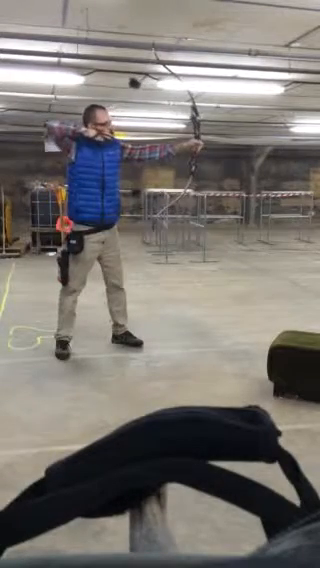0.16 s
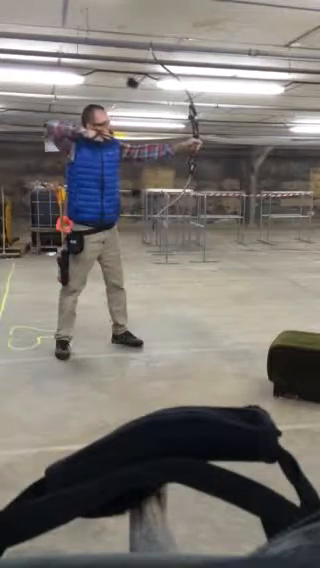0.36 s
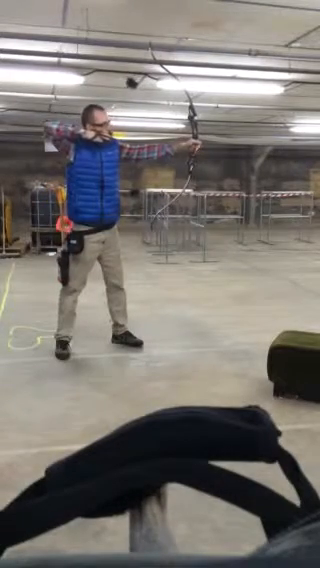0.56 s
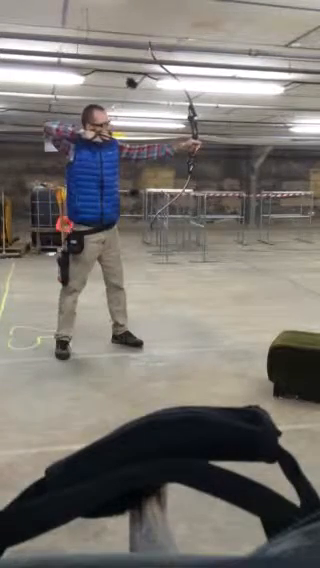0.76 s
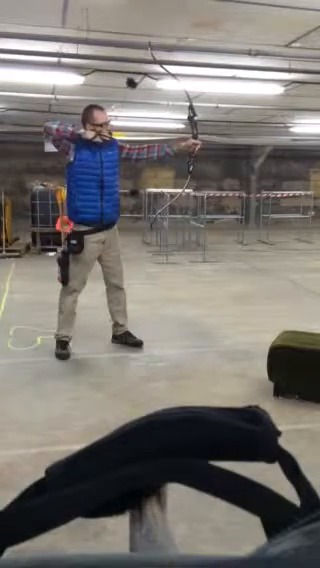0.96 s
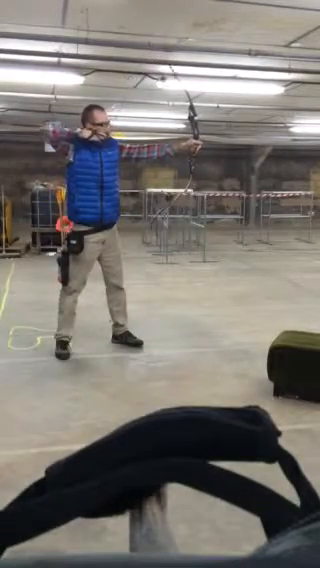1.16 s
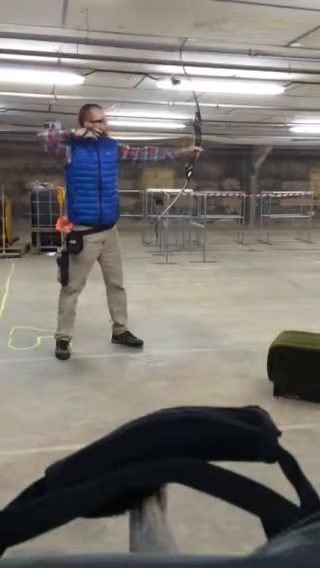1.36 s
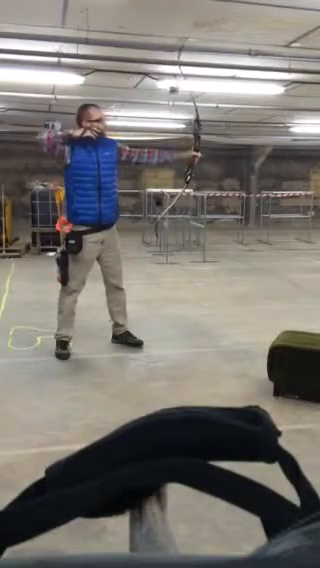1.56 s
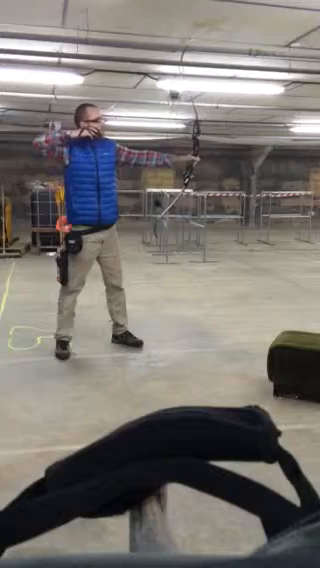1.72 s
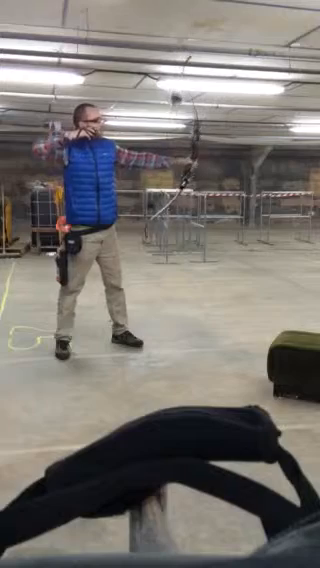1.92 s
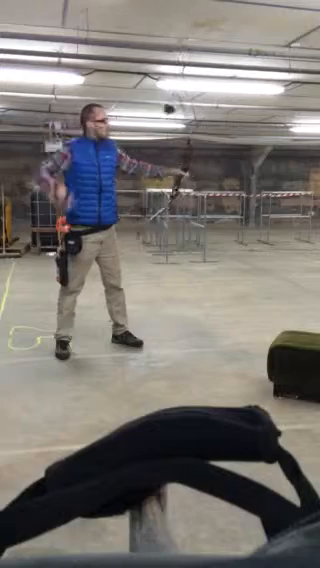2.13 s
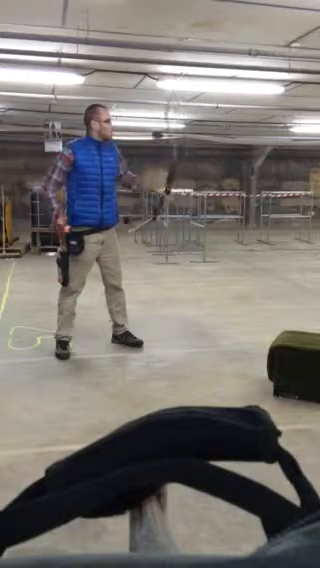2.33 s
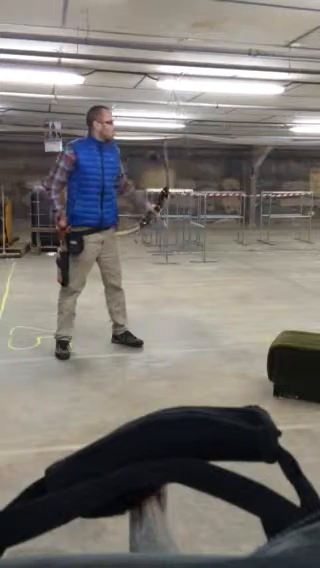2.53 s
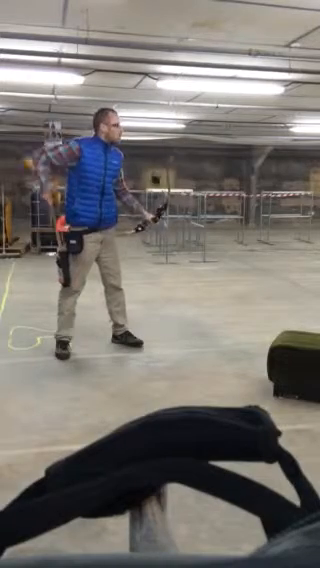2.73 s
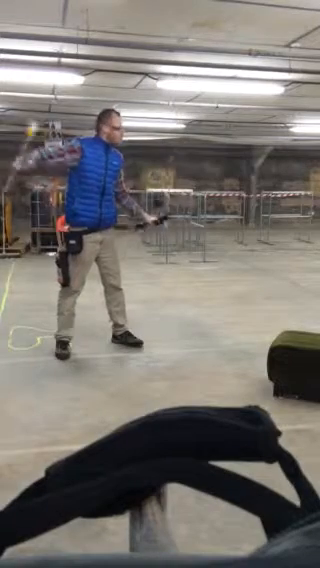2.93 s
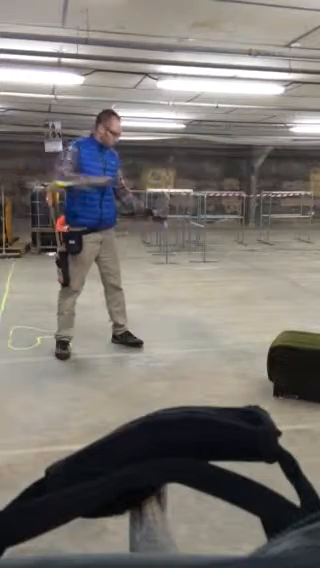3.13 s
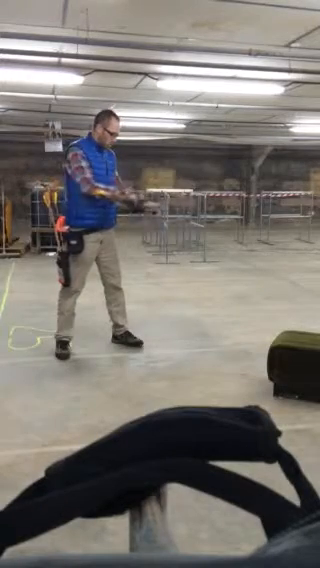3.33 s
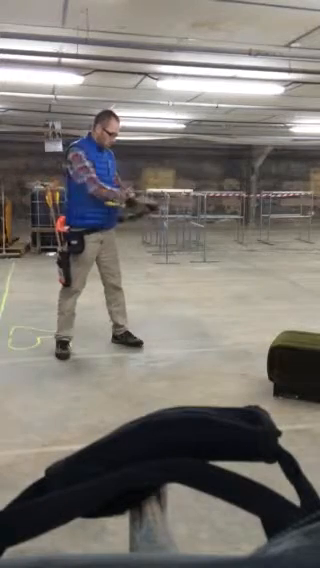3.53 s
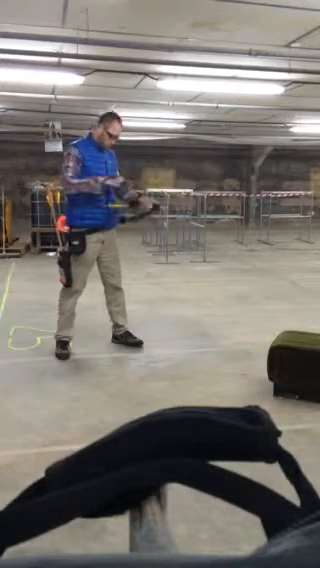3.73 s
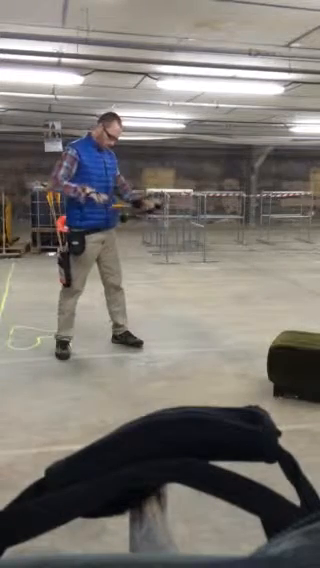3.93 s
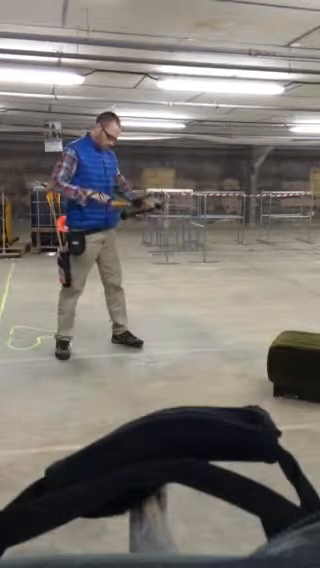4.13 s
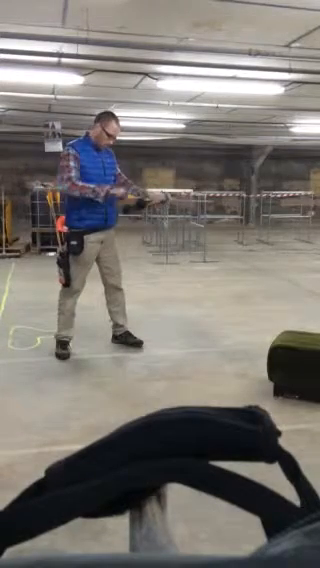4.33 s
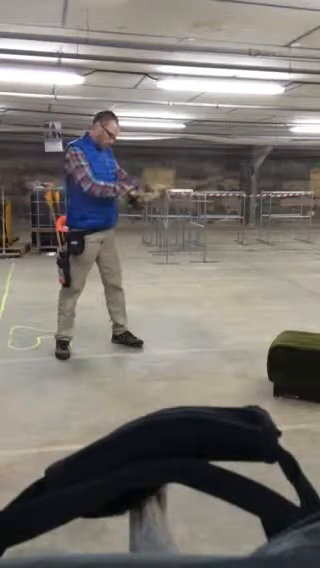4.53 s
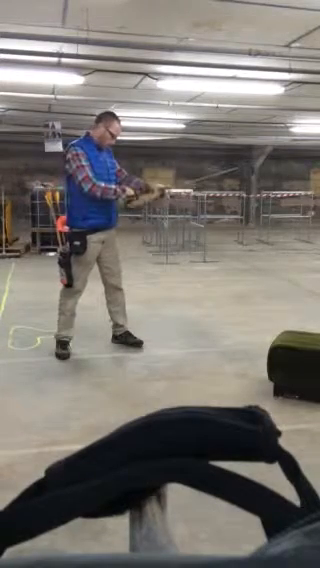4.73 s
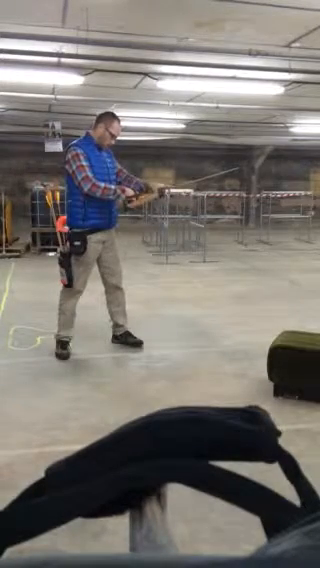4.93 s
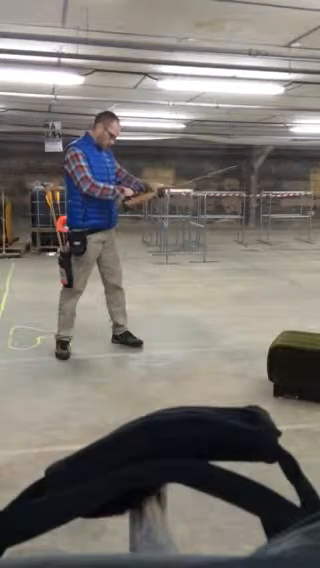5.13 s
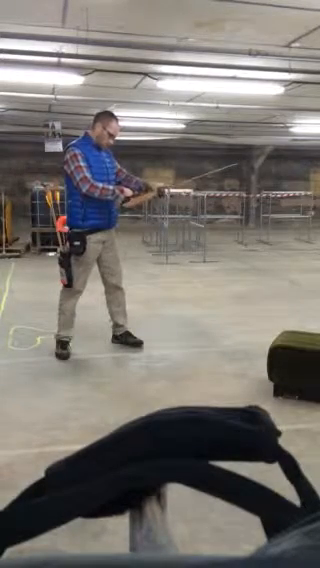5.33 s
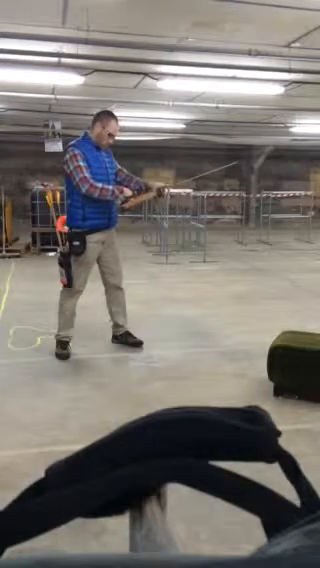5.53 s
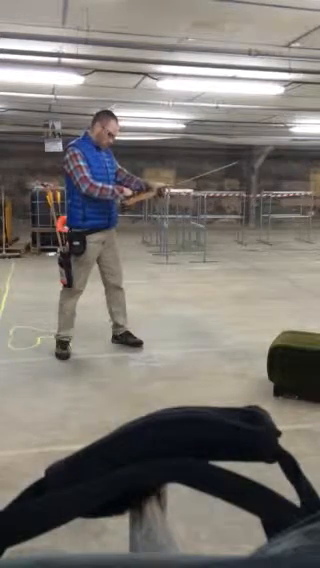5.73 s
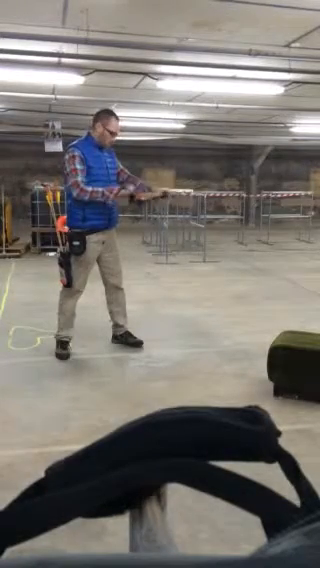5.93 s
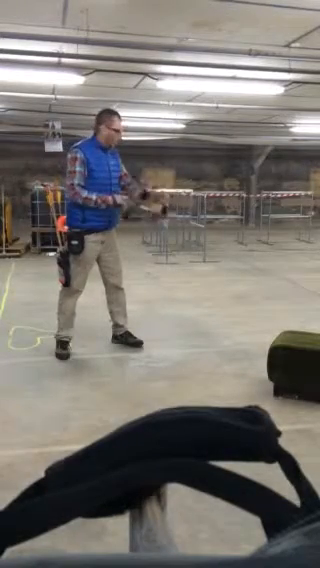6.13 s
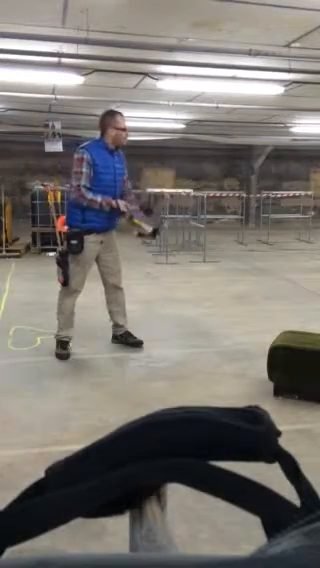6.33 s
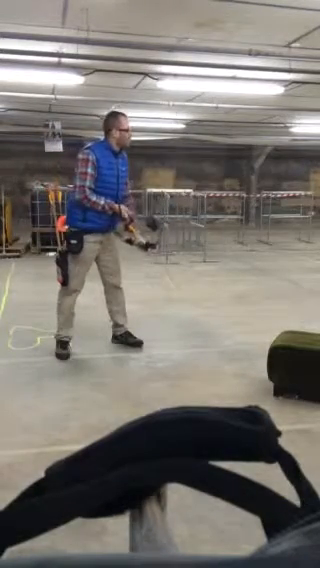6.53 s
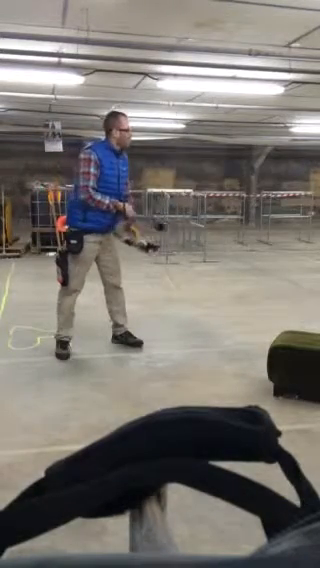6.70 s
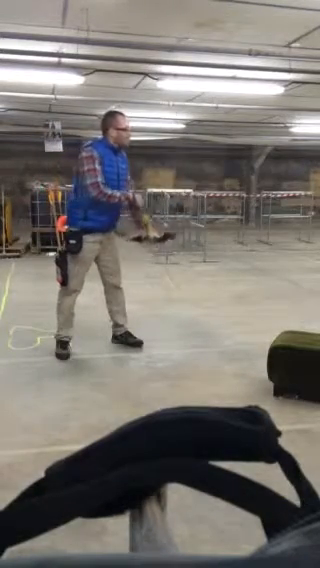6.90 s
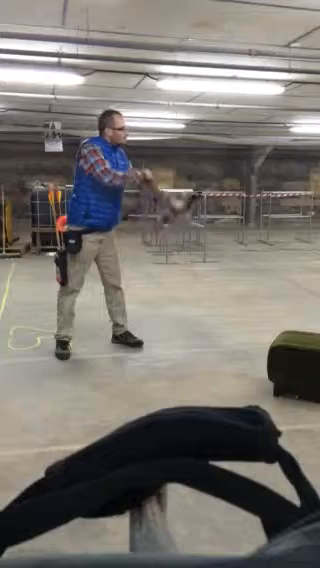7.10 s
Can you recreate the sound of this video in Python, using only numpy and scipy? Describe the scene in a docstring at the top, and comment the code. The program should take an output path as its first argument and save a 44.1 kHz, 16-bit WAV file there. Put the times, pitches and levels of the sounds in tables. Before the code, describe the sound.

A large, low concrete hall, heard from a few metres away, with very faint ventilation rumble, hiss and wavering mains hum throughout. Slight cloth rustle and two tiny ticks come in the first half second. At about 1.2 s the bowstring slips with a quick crackle and slaps home at 1.26 s, loud and sharp with low body; the limbs hum briefly and the hall echoes. At 1.79 s the arrow hits a distant target: a deep, dull thump, with a slight tear and a booming tail. From 2.45 to 3.2 s arrows tick and rattle in the quiver, strongest at 2.85 s, with cloth swishes. Soft rustle follows; at 3.52 s the shaft clacks brightly on the bow and bounces. Around 4.45 s it makes a short, faint, resonant scrape. Tiny ticks lead to a crisp double-edged nock snap at 5.76 s. Light clothing rustles from 6.2 to 7 s.

```python
"""A bowstring, loosed in a low, wide concrete hall, slips and slaps home as coloured noise bursts; the limbs
ring as damped modes. Half a second later the arrow thumps into a far target: a burst and a modal ring.
A new arrow is drawn with small ticks, knocked, slid over the rest as filtered friction grains and clicked
onto the string. Clothing rustles as clumped noise, over faint ventilation noise and narrow-band mains hum.
Two-slope reverberation and discrete early echoes place the sounds near by or at the far end."""
import sys
import numpy as np
from scipy import signal
from scipy.fft import rfft, irfft, next_fast_len
from scipy.io import wavfile
from scipy.ndimage import uniform_filter1d

SR = 44100
rng = np.random.default_rng(int(sys.argv[2]) if len(sys.argv) > 2 else 0)


def int16_out(signal):
    """Quantize to a 16-bit WAV file."""
    q = np.round(np.clip(np.atleast_2d(signal).T, -1, 1) * 32767)
    wavfile.write(sys.argv[1], SR, q.astype(np.int16))


N = 315756

# Levels in the tables apply before the filters and the hall; spectra are relative, per Hz.
# ventilation spectrum: [f/Hz, level/dB]
AIR_SPECTRUM = [(12, -49.5), (20, -25), (39, -2.5), (103, -5), (207, -11.5), (266, -22), (298, -15),
                (597, -22.5), (649, -20.5), (746, -25), (906, -26.5), (1340, -27.5), (2680, -31.5),
                (3000, -31), (15500, -36)]
AIR_DB = -68.5   # rms
# wavering mains hum: [f/Hz, bandwidth/Hz, rms level/dB]
HUM_BANDS = [(96, 6.1, -80.5), (196.75, 2.7, -78.5), (284, 6.9, -89)]

# clothing and arrows brushing, one row per movement: [t/s at full level, hold/s, level/dB, swish level/dB re cloth]
MOVEMENTS = [(0.0, 0.27, -78, -13.5), (2.64, 0.047, -67.5, -14), (2.79, 0.047, -57.5, -10),
             (2.985, 0.013, -67.5, -23), (3.16, 0.1, -76, -8), (3.36, 0.33, -76.5, -2),
             (4.29, .09, -86.5, 10), (4.6, 0.15, -84.5, 6), (6.26, 0.071, -76.5, -10),
             (6.51, 0.092, -77.5, -13), (6.759, 0.13, -70.5, -10), (7.02, .2, -75, -5)]
# cloth spectrum: [f/Hz, level/dB]
CLOTH_SPECTRUM = [(400, -21.5), (700, -5), (1400, 0), (2100, -7), (3500, -4), (6000, -6), (9000, -16),
                  (15500, -26.5)]
RUSTLE_RISE_DB_PER_S, RUSTLE_FALL_DB_PER_S = 211, 84
RUSTLE_CLUMP_DB, RUSTLE_CLUMP_S = 3, 0.0068   # rms level variation; averaging time

# ticks of arrows in the quiver and gear: [t/s, level/dB, centre f/Hz]
TICK_EVENTS = [(0.378, -52, 1780), (0.524, -58, 1400), (2.4524, -37, 3840), (2.6303, -46.5, 3670),
               (2.658, -43.5, 3590), (2.6794, -44.5, 5410), (2.755, -53, 3620), (2.778, -44, 900),
               (2.8001, -37.5, 3100), (2.852, -27.5, 3800), (2.875, -37, 1500), (2.9626, -50, 5150),
               (2.988, -47, 4050), (3.159, -45.5, 3540), (3.1874, -53, 3530), (3.428, -56, 4730),
               (4.7462, -57, 4580), (5.3094, -60.5, 3395), (5.4819, -55, 4720)]
# modes of the loose arrows: [f/Hz, level/dB, t60/s]
QUIVER_MODES = [(942, -2.5, .04), (1420, 1.5, 0.026), (2550, -9, .03), (3123, -5, 0.025),
                (3510, -3.5, 0.036), (4220, -6, 0.025), (4880, 0, 0.03), (7200, 0, 0.021)]
TICK_DECAY_S, TICK_RING_DB = 0.0029, -18   # time constant of the crack; ring drive relative to it

# string contacts at the loose: [t/s, level/dB, decay constant/s, low cut f/Hz]
STRING_CONTACTS = [(1.192, -51, 0.0094, 917), (1.239, -43, 0.0055, 913), (1.2434, -29.5, 0.0055, 895),
                   (1.249, -34.5, 0.011, 705), (1.2561, -19, 0.0095, 200.5), (1.2609, -21.5, 0.0052, 60.7),
                   (1.268, -29, 0.004, 58.7)]
# string slap spectrum: [f/Hz, level/dB]
SLAP_SPECTRUM = [(35, -31), (60, 7), (142, 2), (585, -8), (773, -11), (1230, -7), (2250, -15.5),
                 (2650, -11), (3340, -13.5), (3840, -10), (5080, -17.5), (9080, -20.5), (15500, -24)]
# modes of limbs and string: [f/Hz, level/dB, t60/s]
LIMB_MODES = [(120.6, -4.5, 1.3), (172.4, -13, 0.92), (176.3, -10.5, 2.2), (295.7, -14.5, 0.24),
              (327.2, 6, 0.4), (482, -8, 0.4), (642, -10.5, 0.49), (994, -6.5, 0.11), (1510, -3, 0.076)]
LIMBS_DB = -31.5

# spectrum of the arrow entering the target: [f/Hz, level/dB]
THUMP_SPECTRUM = [(15, -46.5), (35, -18), (66, -3), (119, -2), (152, 1.5), (209, -9), (331, -6.5),
                  (359, -6), (389, -5), (703, -18.5), (1000, -25), (1530, -19), (2200, -24), (2850, -33),
                  (5580, -32), (10900, -44), (15500, -48)]
# target modes: [f/Hz, level/dB, t60/s]
TARGET_MODES = [(145, -3, 0.58), (67.95, -6, 0.2), (232.5, -7, 0.078), (341.4, -4.5, 0.31),
                (557.3, -12.5, 0.18)]
THUMP_S, THUMP_DB, THUMP_DECAY_S = 1.7865, -13, 0.0012
TARGET_RING_DB = -23

# the shaft bounces on the bow: [t/s, level/dB]
SHAFT_BOUNCES = [(3.5175, -47), (3.5211, -27), (3.534, -42), (3.547, -46)]
# arrow shaft modes: [f/Hz, level/dB, t60/s]
SHAFT_MODES = [(1150, -3, .05), (1900, -4, .03), (2175, -7, .07), (2724, 0, .08), (3320, -1, .1),
               (3375, -3, .3), (3410, -3, .2), (3950, -3, .03), (4880, -2, .025), (5650, -1, .025),
               (6100, 6, .02), (6300, 3, .035), (7340, 0, .025)]
SHAFT_RING_DB = -17.5   # ring drive relative to each clack

# resonances that catch in turn as the contact moves along the shaft: [f/Hz, bandwidth/Hz, level/dB, loudest t/s]
REST_RESONANCES = [(1340, 96, -2, 4.49), (1685, 79, -2, 4.44), (1935, 60, -1.5, 4.54),
                   (2550, 56, -4.5, 4.46), (2785, 79, 2, 4.52), (3305, 75, 1.5, 4.535),
                   (3680, 90, -6, 4.44), (3900, 36, -1, 4.495), (4880, 140, -6, 4.46)]
SLIDE_S, SLIDE_HOLD_S, SLIDE_DB = 4.44, 0.084, -59.5
SLIDE_RISE_DB_PER_S, SLIDE_FALL_DB_PER_S = 500, 300

# the nock snaps onto the string: [t/s, level/dB]
NOCK_STEPS = [(5.7614, -34), (5.7647, -27), (5.7657, -26.5)]
# bow handle modes: [f/Hz, level/dB, t60/s]
HANDLE_MODES = [(646, -11, .1), (1012, -8, .07), (1367, -24, 1.1), (1416, 6.5, .055), (2550, -9, .04),
                (3068, -9, .035), (3984, -1, .018), (5200, -2, .012), (5900, -3, .012)]
NOCK_RING_DB = -42.5   # blow on the handle

# reverberation: [f/Hz, t60/s from near by, t60/s from the far end]
HALL_DECAY = [(50.1, 0.97, 1.7), (124, 1.1, 1.38), (300, 1.6, 1.35), (700, 0.91, 1.164), (1510, 0.86, 0.9),
              (2920, 0.78, 0.74), (5800, 0.64, 0.51), (9750, 0.33, 0.27), (15100, 0.3, 0.2)]
# floor, ceiling and pillars: [delay t/s, level/dB]
NEAR_REFLECTIONS = [(.005, -8), (.011, -7.5), (.025, -9.5), (.045, -14)]
# floor and walls by the target: [delay t/s, level/dB re the shielded direct path]
FAR_REFLECTIONS = [(.0068, 2.5), (.013, 0.5), (0.037, 3), (.046, 2), (.083, -2)]
SHIELD_DB = -5   # the direct path from the target is partly blocked
RING_SENT_DB = -6.5   # share of the ringing parts that fills the hall
CUTOFF_HZ = 15900   # stopband edge of the microphone's upper limit


def from_db(db):
    """Level to amplitude: 20 dB is a factor of ten."""
    return 10 ** (np.asarray(db) / 20)


def rms_one(x):
    """Normalisation: scale to unit root-mean-square."""
    return x / np.sqrt(np.mean(x ** 2) + 1e-20)


def at_hz(points, hz, axis=1):
    """Linear interpolation of a table column over logarithmic frequency."""
    points = np.array(points)
    return np.interp(np.log(hz + 1), np.log(points[:, 0]), points[:, axis])


def above(x, hz):
    """Second-order Butterworth low cut."""
    return signal.sosfilt(signal.butter(2, hz, "high", fs=SR, output="sos"), x)


def coloured(x, spectrum):
    """Minimum-phase filtering: the folded cepstrum gives a causal response of mean power gain 1."""
    size = next_fast_len(len(x) + SR)
    db = at_hz(spectrum, np.arange(size // 2 + 1) * SR / size)
    db -= 10 * np.log10(np.mean(from_db(2 * db)))
    cepstrum = irfft(db * np.log(10) / 20, size)
    cepstrum[1:size // 2] *= 2
    cepstrum[size // 2 + 1:] = 0
    response = np.exp(rfft(cepstrum))
    return irfft(rfft(x, size) * response, size)[:len(x)]


def resonate(x, hz, width_hz):
    """Two-pole resonance: the pole radius sets the bandwidth, with about unit gain at the peak."""
    r = np.exp(-np.pi * width_hz / SR)
    numerator = np.array([1, 0, -1]) * (1 - r * r) / 2
    return signal.lfilter(numerator, [1, -2 * r * np.cos(2 * np.pi * hz / SR), r * r], x)


def struck(clicks, modes):
    """Modal superposition: an impulse starts every mode as an exponentially damped sine."""
    out = 0
    for hz, db, t60 in modes:
        r = from_db(-60 / (t60 * SR))
        w = 2 * np.pi * hz / SR
        numerator = [0, from_db(db) * np.sin(w)]
        out = out + signal.lfilter(numerator, [1, -2 * r * np.cos(w), r * r], clicks + 1e-18)
    return out


def click(s, db):
    """Ideal impulse: a blow of negligible duration."""
    out = np.zeros(N)
    out[round(s * SR)] = from_db(db)
    return out


def burst(s, db, decay_s):
    """Impulsive noise: instant onset, exponential decay and a nearly flat spectrum."""
    shape = np.exp(-np.arange(2048) / SR / decay_s)
    crack = rng.standard_normal(len(shape))
    for _ in range(6):      # even out the spectrum, then restore the decay
        spectrum = rfft(crack * shape)
        even = irfft(spectrum / np.abs(spectrum))
        crack = even / np.sqrt(np.abs(uniform_filter1d(even ** 2, size=44)) + 1e-12)
    out, at = np.zeros(N), round(s * SR)
    out[at:at + len(shape)] = from_db(db) * crack * shape
    return out


def stroke(s, held_s, db, rise_db_per_s, fall_db_per_s):
    """Exponential envelope: level rises linearly in dB up to s, holds, then falls linearly."""
    time = np.arange(N) / SR
    rise = rise_db_per_s * np.maximum(s - time, 0)
    fall = fall_db_per_s * np.maximum(time - s - held_s, 0)
    return from_db(db - rise - fall)


def background():
    """Stationary noise: broad ventilation rumble and hiss, and hum that wavers as narrow-band noise."""
    air = from_db(AIR_DB) * rms_one(coloured(rng.standard_normal(N), AIR_SPECTRUM))
    white = rng.standard_normal(N)
    hum = sum(from_db(db) * rms_one(resonate(white, hz, width_hz)) for hz, width_hz, db in HUM_BANDS)
    return air + hum


def rustle():
    """Fibre friction: uneven, clumped grains give a crackle, with a thin swish in each movement's share."""
    grains = rng.standard_normal(N) * from_db(2.3 * np.minimum(rng.exponential(1, N), 5))
    clumps = rms_one(uniform_filter1d(rng.standard_normal(N), round(RUSTLE_CLUMP_S * SR)))
    grains *= from_db(RUSTLE_CLUMP_DB * clumps)
    cloth = rms_one(coloured(grains, CLOTH_SPECTRUM))
    swish = rms_one(above(resonate(grains, 4800, 5600), 5000))
    out = 0
    for s, held_s, db, swish_db in MOVEMENTS:
        gain = stroke(s, held_s, db, RUSTLE_RISE_DB_PER_S, RUSTLE_FALL_DB_PER_S)
        out = out + gain * (cloth + from_db(swish_db) * swish)
    return out


def ticks():
    """Impact excitation: each short crack, around its own pitch, sets the loose arrows' modes ringing."""
    cracks = sum(resonate(burst(s, db, TICK_DECAY_S), hz, 0.7 * hz) for s, db, hz in TICK_EVENTS)
    blows = sum(click(s, db + TICK_RING_DB) for s, db, _ in TICK_EVENTS)
    return above(above(cracks, 800), 800), above(struck(blows, QUIVER_MODES), 800)


def loose():
    """Impulsive release: the string slips off the fingers and slaps home; the limbs ring in damped modes."""
    contacts = sum(above(burst(s, db, decay_s), low_hz) for s, db, decay_s, low_hz in STRING_CONTACTS)
    home_s = STRING_CONTACTS[5][0]
    return coloured(contacts, SLAP_SPECTRUM), struck(click(home_s, LIMBS_DB), LIMB_MODES)


def target():
    """Damped impact: the arrow's push and tear into the packed target, and its dull modal ring."""
    push = coloured(burst(THUMP_S, THUMP_DB, THUMP_DECAY_S), THUMP_SPECTRUM)
    ring = struck(click(THUMP_S, TARGET_RING_DB), TARGET_MODES)
    tear = above(resonate(burst(THUMP_S, -28.5, 0.002), 3300, 4200), 1800)
    return push, ring, tear


def knock():
    """Repeated impact: a bright rattling clack drives the shaft's modes at every bounce."""
    bounces = sum(burst(s, db, 0.0024) for s, db in SHAFT_BOUNCES)
    clack = above(resonate(bounces, 2950, 4260), 1200)
    blows = sum(click(s, db + SHAFT_RING_DB) for s, db in SHAFT_BOUNCES)
    ring = struck(blows, SHAFT_MODES)
    return above(clack, 950), above(above(ring, 950), 950)


def slide():
    """Sliding friction: random grains sound broadly and through successive resonances of shaft and rest."""
    grains = rng.standard_normal(N) * (rng.random(N) < 3000 / SR)   # about 3000 grains per second
    time = np.arange(N) / SR
    rings = 0
    for hz, width_hz, db, s in REST_RESONANCES:
        catch = np.exp(-((time - s) / 0.026) ** 2)
        rings = rings + from_db(db) * rms_one(resonate(grains, hz, width_hz)) * catch
    broad = rms_one(above(resonate(resonate(grains, 2700, 4200), 3150, 7300), 900))
    gain = stroke(SLIDE_S, SLIDE_HOLD_S, SLIDE_DB, SLIDE_RISE_DB_PER_S, SLIDE_FALL_DB_PER_S)
    return gain * (from_db(-2.5) * rings + from_db(-4.5) * broad)


def nock():
    """Structure-borne sound: a bright snap in quick steps whose last step rings the bow handle."""
    steps = sum(burst(s, db, 0.002) for s, db in NOCK_STEPS)
    snap = above(above(resonate(steps, 2930, 5400), 1460), 1440)
    ring = struck(click(NOCK_STEPS[2][0], NOCK_RING_DB), HANDLE_MODES)
    return snap, above(ring, 540)


def hall(direct, sent, far, wet_db, build_s, late_db):
    """Room acoustics: dull early echoes, then a diffuse tail; far bays add a weaker decay of twice the t60."""
    age = np.arange(3 * SR) / SR
    white = rng.standard_normal((2, len(age)))
    edges = 25 * 2 ** np.arange(0, 9.7, 1 / 6)   # sixths of an octave
    tail = 0
    for k, (low, high) in enumerate(zip(edges, edges[1:])):
        # neighbouring bands use different noise
        band = signal.sosfilt(signal.butter(2, [low, high], "band", fs=SR, output="sos"), white[k % 2])
        t60 = at_hz(HALL_DECAY, np.sqrt(low * high), axis=1 + far)
        fall = np.exp(-np.log(1000) * age / t60)
        tail = tail + band * (fall + from_db(late_db) * np.sqrt(fall))
    response = from_db(wet_db) * tail * (1 - np.exp(-age / build_s))
    out = signal.fftconvolve(sent, response)[:N] + direct
    dulled = signal.lfilter([.65], [1, -.35], direct)
    for s, db in FAR_REFLECTIONS if far else NEAR_REFLECTIONS:
        delay = round(s * SR)
        out[delay:] += from_db(db) * dulled[:-delay]
    return out


def scene():
    """Superposition: near sounds and the far target each pass through the hall; tear and background do not."""
    slap, limbs = loose()
    push, target_ring, tear = target()
    cracks, rings = np.sum([ticks(), knock(), nock()], axis=0)
    handling = cracks + slide() + rustle()
    sent = slap + from_db(-2.5) * handling + from_db(-6.5) * limbs + from_db(RING_SENT_DB) * rings
    near = hall(slap + handling + limbs + rings, sent, False, wet_db=-37.5, build_s=0.0014, late_db=-14.0)
    shielded = from_db(SHIELD_DB) * (push + target_ring)
    far_sent = push + from_db(-12) * target_ring
    far = hall(shielded, far_sent, True, wet_db=-25.0, build_s=0.0078, late_db=-12)
    return (near + far + tear + background())[None]


def record(dry):
    """Band limitation: the microphone drops the deepest bass; the top is cut steeply."""
    top_cut = signal.cheby2(16, 60, CUTOFF_HZ, fs=SR, output="sos")
    return signal.sosfilt(top_cut, above(dry, 40))


dry = scene()
out = record(dry)
int16_out(out)
```